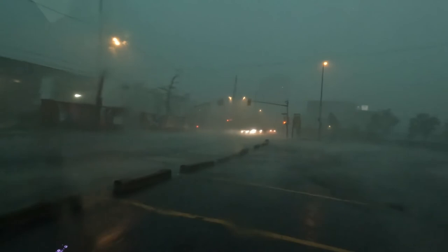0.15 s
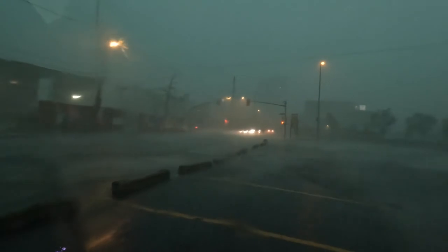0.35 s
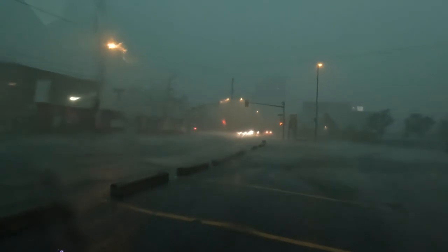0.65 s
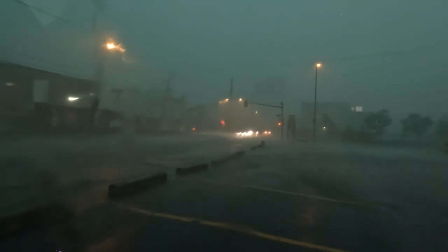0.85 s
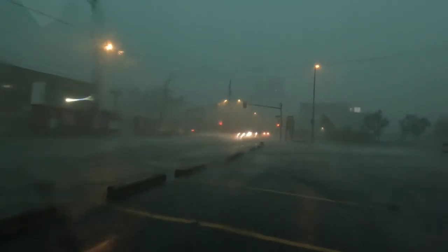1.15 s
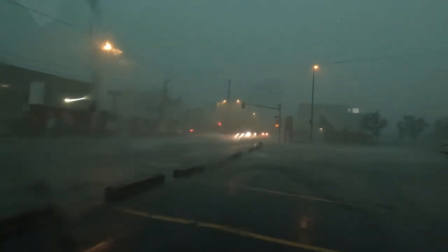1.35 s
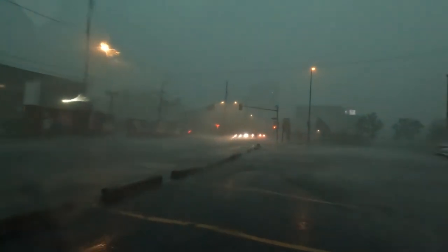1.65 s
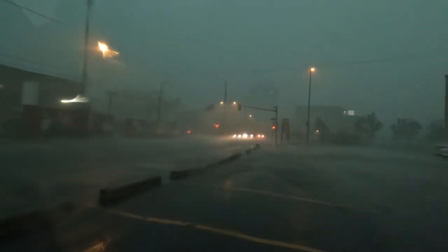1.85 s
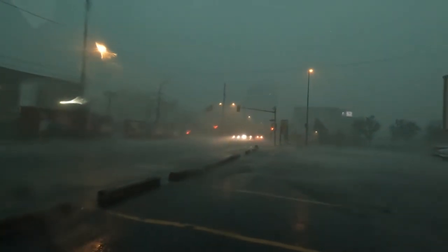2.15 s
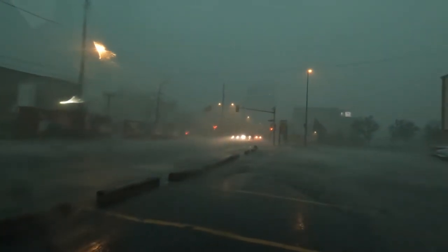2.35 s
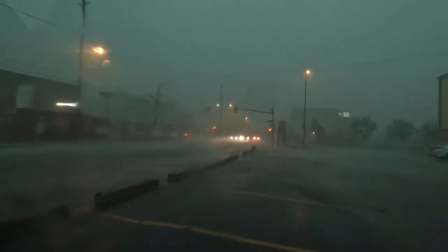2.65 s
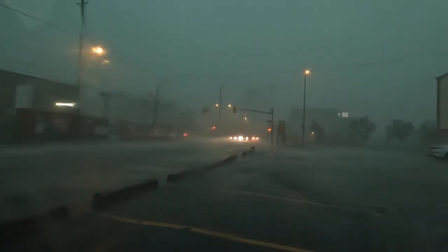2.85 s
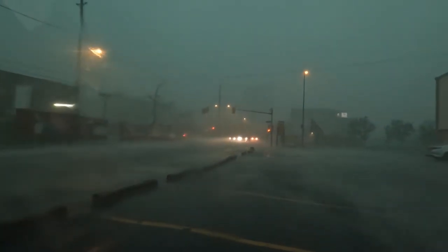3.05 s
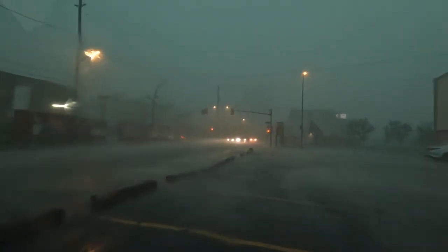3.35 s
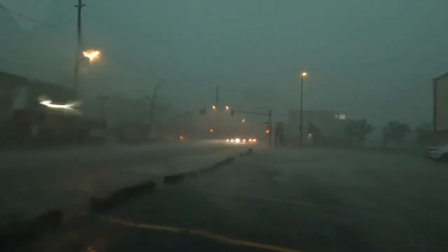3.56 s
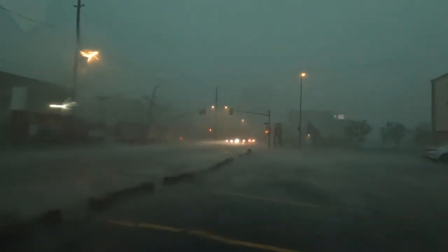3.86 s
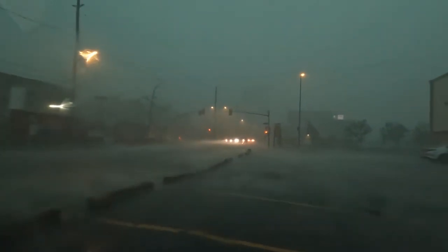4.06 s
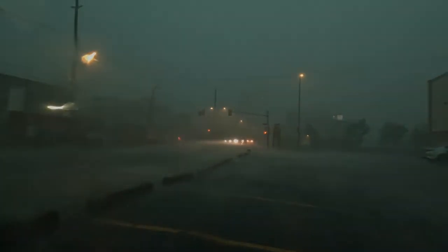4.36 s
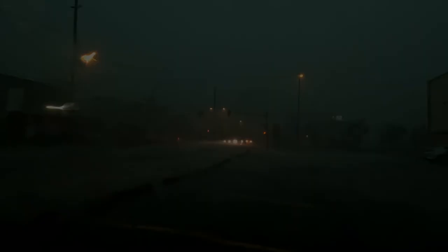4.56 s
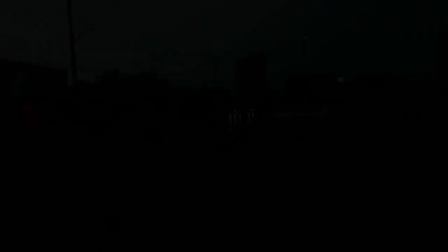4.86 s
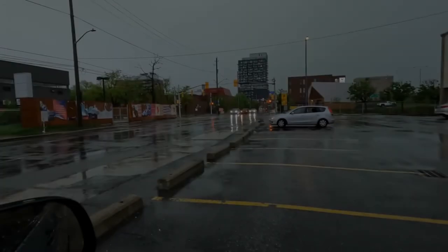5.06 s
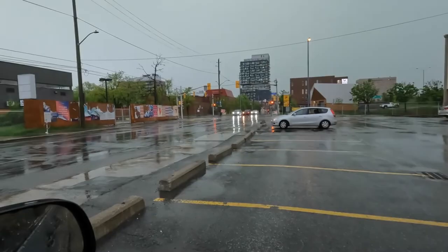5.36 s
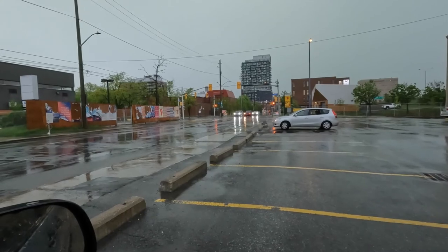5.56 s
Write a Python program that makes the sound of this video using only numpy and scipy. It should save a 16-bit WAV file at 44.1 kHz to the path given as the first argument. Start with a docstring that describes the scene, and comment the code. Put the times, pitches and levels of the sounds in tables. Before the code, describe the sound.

Inside a car, a rainstorm pounds and buffets in quick surges, dies away, then abruptly becomes soft even rain over a low rumble.

```python
"""A violent rainstorm heard from a parked car. From the start, gusts throw sheets of rain: dense noise
drums on the body and sharper noise spatters on the glass. Low noise and short, deep pulses make the wind
that buffets the car and booms in the cabin; a band of noise wandering in pitch is its hollow howl.
The storm fades to silence. A cut then leads to lighter, steady rain made of noise and small impacts,
over a low rumble and drone of evened-out noise, with a faint, brief squeak of gliding tones."""
import sys
import numpy as np
from scipy import signal
from scipy.fft import rfft, irfft
from scipy.io import wavfile
from scipy.ndimage import uniform_filter1d

SR = 44100
rng = np.random.default_rng(int(sys.argv[2]) if len(sys.argv) > 2 else 0)


def put_to_file(sound):
    """Save the sound as 16-bit audio at rate SR, in the file named by the first command-line argument."""
    columns = np.atleast_2d(sound).T  # one column per channel
    safe = np.clip(columns, -1, 1)
    whole_steps = np.round(safe * 32767)
    wavfile.write(sys.argv[1], SR, whole_steps.astype(np.int16))


N = 252232
TIME, FREQS = np.arange(N) / SR, np.fft.rfftfreq(N, 1 / SR)
CUT_S, FADE_START_S, FADE_POWER = 4.806, 4.414, 1.1  # the storm fades to silence at the cut
EDGE_HZ = 13900  # top of the sound
# the downpour between gusts
LULL_ROAR_DB, LULL_SPRAY_DB, LULL_BOOM_DB, LULL_LIFT_DB = -38, -44, -33.5, 1.5
GUST_FALL_POWER = 1.5  # shape of every gust's fall: 1 = exponential, 2 = bell


def gust_shape(crest_s, rise_s, fall_s):
    """One gust: a quick swell to a rounded crest, then a fall along the shared curve."""
    early = np.maximum(crest_s - TIME, 0)
    late = np.maximum(TIME - crest_s, 0)
    return np.exp(-(early / rise_s) ** 2 - (late / fall_s) ** GUST_FALL_POWER)


# gusts, each flinging a sheet of rain at the car; levels are what each adds at its crest:
# (crest_s, rise_s, fall_s, roar_db on the body, spray_db on the glass, boom_db in the cabin,
#  lift_db of the roar's treble)
GUST_ROWS = [(0.04, 0.075, 0.12, -24, -33.5, -29, 1.5), (0.24, 0.13, 0.13, -22, -30.5, -29, 3),
             (0.5, 0.22, 0.61, -38.5, -41.5, -30, -5), (0.85, 0.14, 0.1, -26.5, -33, -33, 2.5),
             (0.957, 0.049, 0.11, -35.5, -38.5, -27, -5), (1.269, 0.12, 0.13, -25.5, -38, -26.5, 4),
             (1.395, 0.081, 0.09, -30, -39.5, -31.5, 5), (1.545, 0.099, 0.17, -39, -43.5, -30.5, 2.5),
             (1.834, 0.063, 0.16, -28.5, -40.5, -25.5, 3), (1.974, 0.068, 0.15, -27.5, -36.5, -31, 3),
             (2.094, 0.05, 0.17, -26, -42.5, -32.5, -2.5), (2.304, 0.092, 0.12, -22, -32.5, -29, 0.5),
             (2.434, 0.048, 0.078, -26.5, -37, -33, -1), (2.549, 0.075, 0.19, -25, -32.5, -35, -1),
             (2.757, 0.12, 0.18, -29, -35.5, -34, -6), (2.998, 0.22, 0.14, -25.5, -40, -34, -1),
             (3.216, 0.097, 0.1, -28.5, -50, -28.5, 2.5), (3.318, 0.073, 0.19, -25, -33, -29.5, 0.5),
             (3.579, 0.17, 0.12, -30, -35.5, -34, 0), (3.79, 0.047, 0.087, -27.5, -37, -49, 2),
             (3.888, 0.082, 0.16, -25.5, -36, -33.5, -1), (4.047, 0.11, 0.18, -25.5, -34.5, -29, 0.5),
             (4.32, 0.13, 0.2, -26.5, -36.5, -29, 7), (4.6, 0.15, 0.13, -30.5, -44, -50, 2)]


def gusting():
    """Gusts add their power to the downpour; gives roar, spray, boom and treble lift in dB over time."""
    body, glass, cabin = amp([LULL_ROAR_DB, LULL_SPRAY_DB, LULL_BOOM_DB]) ** 2
    lift = body * LULL_LIFT_DB
    for crest_s, rise_s, fall_s, roar_db, spray_db, boom_db, lift_db in GUST_ROWS:
        power = gust_shape(crest_s, rise_s, fall_s) ** 2
        body = body + power * amp(roar_db) ** 2
        glass = glass + power * amp(spray_db) ** 2
        cabin = cabin + power * amp(boom_db) ** 2
        lift = lift + power * amp(roar_db) ** 2 * lift_db
    # dividing by the power makes the lift an average, where the stronger gust counts more
    return 10 * np.log10(body), 10 * np.log10(glass), 10 * np.log10(cabin), lift / body


# tone colour of the roar: (pitch_hz, relative level_db)
ROAR_COLOUR = [(76, -33), (130, -1.5), (231, 0.5), (287, -1.5), (341, -2), (401, -3.5), (503, -4),
               (570, -3), (805, -9), (920, -8), (1190, -8), (1350, -7), (1640, -12.5), (2230, -16.5),
               (3200, -22.5), (4160, -33.5), (7040, -120)]
# panel resonances that colour the roar: (pitch_hz, width_hz, average boost_db at full ringing)
PANEL_TONES = [(227, 25, 2.5), (347, 32, 0), (596, 51, 2), (934, 69, 4.5), (1080, 110, 3.5),
               (1280, 74, 4.5), (2030, 100, 4), (2170, 70, 3)]
# how strongly the panels ring, less as the wind veers: (time_s, share from 0 to 1)
PANEL_RINGING = [(3.6, 0.98), (3.9, 0.93)]


def roar(roar_db, lift_db):
    """Sheets of rain drum on the panels, too dense to tell the drops apart, and make them ring."""
    drumming = white() + amp(-4) * drops(per_s=1500, spread_db=2.5, splash_s=0.0011, splash_db=-13.5)
    drumming = patchy(drumming, depth_db=0.72, size=(7, 14))
    ringing = ring(drumming, PANEL_TONES, waver=0.17, wander_hz=21.4)
    panels = drumming + follow(PANEL_RINGING, 1) * (ringing - drumming)
    coloured = place(panels, read(ROAR_COLOUR), STORM_IMAGE)
    flicker_db = 0.64 * drift(rate_hz=22)
    return brighten(coloured, 1900, lift_db) * amp(roar_db + flicker_db)


# tone colour of the spray: (pitch_hz, relative level_db)
SPRAY_COLOUR = [(300, -9), (550, -11), (760, -45), (1000, -11), (2200, -2), (3100, -8.5), (5000, -13.5),
                (6800, -17), (7700, -20.5), (8400, -28), (10800, -35.5), (12400, -40), (13300, -40),
                (13900, -64)]
# faint resonances of the glass under the spray: (pitch_hz, width_hz, average boost_db)
GLASS_TONES = [(3730, 53, 3), (6000, 63, 3.5), (6340, 82, 3), (6950, 65, -0.5), (7630, 77, 1.5)]
# lift of the spray's top end in the lull, and how much it gains for each dB of spray
FIZZ_DB, FIZZ_PER_DB = 0.5, 0.6


def spray(spray_db):
    """Driven drops spatter on the glass above a fine hiss; harder gusts add more fizz."""
    spatter = white() + amp(2.0) * drops(per_s=1300, spread_db=1.5, splash_s=0.0072, splash_db=-6)
    spatter = patchy(spatter, depth_db=1.08, size=(12, 14))
    glass = ring(spatter, GLASS_TONES, waver=0.64, wander_hz=30)
    glass = place(glass, read(SPRAY_COLOUR), STORM_IMAGE)
    fizz_db = FIZZ_DB + FIZZ_PER_DB * (spray_db - LULL_SPRAY_DB)
    return brighten(glass, 11700, fizz_db) * amp(spray_db + 0.94 * drift(rate_hz=7))


# tone colour of the wind rocking the body: (pitch_hz, relative level_db)
BUFFET_COLOUR = [(4, 9), (9, 15), (15, 18), (22, 22), (32, 10.5), (42, 6), (60, 7), (120, -57)]
# slow push of the wind that rocks the body: (time_s, level_db)
ROCKING_LEVEL = [(0.2, -32.5), (1.0, -29.5), (1.55, -26), (2.0, -27), (2.3, -34), (2.65, -30), (2.95, -23),
                 (3.3, -31), (3.65, -22.5), (4.0, -28.5), (4.7, -24)]
# tone colour of the cabin boom: (pitch_hz, relative level_db)
BOOM_COLOUR = [(35, -14.5), (58, -3.5), (74, -2), (90, 0.5), (118, -6.5), (170, -13), (235, -15.5),
               (290, -20.5), (350, -16), (600, -60.5)]
# single slaps of wind on the body: (middle_s, level_db, pitch_hz, half_length_s)
SLAP_ROWS = [(0.031, -16, 80, 0.015), (0.104, -20, 85, 0.012), (0.307, -18.5, 93, 0.025),
             (0.441, -12.5, 74, 0.0058), (0.967, -16, 31, 0.03), (1.048, -22, 48, .03),
             (1.211, -18, 14, 0.048), (1.265, -23, 187, .014), (1.425, -28, 38, 0.017),
             (1.474, -16, 17, 0.063), (1.663, -22, 81, 0.023), (1.732, -15.5, 18.5, .06),
             (1.941, -13, 15, 0.035), (2.183, -16, 26, 0.027), (2.264, -14, 19, 0.037),
             (2.378, -19, 89, 0.038), (2.488, -14, 20, 0.046), (2.799, -13.5, 13, 0.047),
             (2.961, -17.5, 13, 0.04), (3.492, -15, 22, 0.062), (3.652, -15.5, 15.7, 0.11),
             (3.763, -15, 17, 0.044), (4.116, -20, 20, 0.049)]


def wind(boom_db):
    """Gusts rock the body and set the cabin air booming; irregular slaps hit it, the deepest from the right."""
    rocking = pressure(BUFFET_COLOUR, STORM_IMAGE, evenness=0.64, size=5000) * amp(follow(ROCKING_LEVEL, 1))
    boom = pressure(BOOM_COLOUR, STORM_IMAGE, evenness=0.88, size=3000) * amp(boom_db)
    slaps = np.zeros(N)
    for middle_s, level_db, pitch_hz, half_length_s in SLAP_ROWS:
        t = TIME - middle_s
        slaps += amp(level_db) * np.exp(-(t / half_length_s) ** 2) * np.cos(2 * np.pi * pitch_hz * t)
    lean = amp(read(STORM_SIDE_DB) / 2) ** np.array([[1], [-1]])  # left and right gains
    return rocking + boom + irfft(rfft(slaps) * lean / lean.mean(0), N)


# the wind's hollow howl: (time_s, level_db, pitch_hz before its random wander)
HOWL_PATH = [(0, -58, 1066), (1.7, -55, 1049), (2.3, -31.5, 1060), (3.1, -42, 1119), (3.65, -41, 1058),
             (3.95, -37, 1013), (4.35, -27.5, 990), (4.5, -30.5, 974), (4.75, -47, 953)]
HOWL_HZ, HOWL_WIDTH_HZ = 1024, 580  # its resonance before it is shifted; width at 6 dB down


def howl():
    """A broad, breathy resonance swells and fades, and wanders in pitch."""
    band_db = -20 * np.log10(1 + (2 * (FREQS - HOWL_HZ) / HOWL_WIDTH_HZ) ** 2)
    shift_hz = follow(HOWL_PATH, 2) + 35 * drift(rate_hz=8.03) - HOWL_HZ
    breath = signal.hilbert(place(white(), band_db, STORM_IMAGE))
    # turning the phase moves the whole band up or down in pitch
    band = breath * np.exp(2j * np.pi * np.cumsum(shift_hz) / SR)
    return band.real * amp(follow(HOWL_PATH, 1))


# tone colours after the storm: (pitch_hz, relative level_db)
LIGHT_RAIN_COLOUR = [(200, -0.5), (400, 0), (750, -0.5), (950, 0.5), (1500, -3), (2100, -4.5), (3200, -8.5),
                     (5000, -14.5), (6800, -19.5), (8300, -29), (11000, -43), (13000, -49), (14000, -52)]
RUMBLE_COLOUR = [(10, 4.5), (25, 11.5), (38, 14), (52, 11), (68, 4.5), (90, -8), (140, -49.5)]
DRONE_COLOUR = [(40, -35), (65, -4.5), (88, 0), (108, -0.5), (150, -5), (205, -13.5), (240, -12),
                (280, -19), (315, -17), (400, -30), (700, -75)]
LIGHT_RAIN_DB, RUMBLE_DB, DRONE_DB = -39.5, -30.5, -31


def light_rain():
    """After the storm: an even patter over a deep rumble and a steady low drone."""
    patter = white() + amp(-5.5) * drops(per_s=1300, spread_db=0.0, splash_s=0.0093, splash_db=-13)
    patter = patchy(patter, depth_db=0.6, size=(12, 16))
    rain = place(patter, read(LIGHT_RAIN_COLOUR), CALM_IMAGE)
    rumble = pressure(RUMBLE_COLOUR, CALM_IMAGE, evenness=0.7, size=4000)
    drone = pressure(DRONE_COLOUR, CALM_IMAGE, evenness=0.79, size=1800)
    return amp(LIGHT_RAIN_DB) * rain + amp(RUMBLE_DB) * rumble + amp(DRONE_DB) * drone


# a faint, brief squeak, one row a tone: (middle_s, level_db, pitch_hz, glide_hz_per_s, half_length_s)
SQUEAK_TONES = [(5.196, -38.5, 2030, -1000, 0.009), (5.194, -43.5, 2950, 17000, 0.008),
                (5.21, -40, 2100, -2000, .005)]


def squeak():
    """A few short tones glide up or down in pitch in the light rain."""
    tones = np.zeros(N)
    for middle_s, level_db, pitch_hz, glide, half_length_s in SQUEAK_TONES:
        t = TIME - middle_s
        swell = np.exp(-(t / half_length_s) ** 2)
        tones += amp(level_db) * swell * np.sin(2 * np.pi * (pitch_hz + glide * t / 2) * t)
    return tones


def pressure(spectrum, image, evenness, size):
    """Low turbulent noise whose lumps are partly evened out over size samples."""
    x = place(white(), read(spectrum), image)
    power = uniform_filter1d(uniform_filter1d(x.mean(0) ** 2, size), size // 2)
    x = x / (abs(power) + 1e-6) ** (np.clip(evenness, 0, 1) / 2)
    return x / x.mean(0).std()


def drops(per_s, spread_db, splash_s, splash_db):
    """Random impacts, mostly small, each a noisy tick with a short splash that dies away."""
    t, out = np.arange(2048) / SR, np.zeros((2, N))
    burst = np.exp(-t / 0.00033) + amp(splash_db) * np.exp(-t / splash_s)
    for _ in range(8):  # eight different splash noises share the drops
        hit = rng.random(N) < per_s / 8 / SR
        sizes = hit * amp(spread_db * np.minimum(rng.exponential(1, N), 4.5))
        splash = rng.standard_normal((2, len(t))) * burst
        out += signal.oaconvolve(sizes[None], splash, axes=1)[:, :N]
    return unit(out)


def ring(x, resonances, waver, wander_hz):
    """Resonances swell, fade and shift a little as the rain lands on different spots."""
    hz, _, z = signal.stft(x, SR, nperseg=2048, noverlap=1536)
    gain_db = np.zeros(z.shape[1:])
    for centre_hz, width_hz, boost_db in resonances:
        wanders = uniform_filter1d(rng.standard_normal((2, z.shape[2])), size=18, axis=1)
        swell, shift = (unit(row) for row in wanders)
        distance_hz = hz[:, None] - centre_hz - wander_hz * shift
        gain_db += boost_db * np.maximum(1 + waver * swell, 0) / (1 + (2 * distance_hz / width_hz) ** 2)
    return signal.istft(z * amp(gain_db), nperseg=2048, noverlap=1536)[1][:, :N]


def patchy(x, depth_db, size):
    """Swells and dips in random patches of pitch and time, size = (bins, frames)."""
    z = signal.stft(x, nperseg=512, noverlap=384)[2]
    field = rng.standard_normal(z.shape[1:])
    field = unit(uniform_filter1d(uniform_filter1d(field, size[0], axis=0), size[1], axis=1))
    return signal.istft(z * amp(depth_db * field), nperseg=512, noverlap=384)[1][:, :N]


def brighten(x, corner_hz, shelf_db):
    """Raises or lowers the treble above a corner, following a curve in dB."""
    treble = irfft(rfft(x) / (1 + (corner_hz / (FREQS + 1)) ** 8), N)
    return x + treble * (amp(shelf_db) - 1)


# how alike left and right are: (pitch_hz, likeness from 0 to 1)
STORM_SAME_SHARE = [(25, 1), (80, 1), (140, 0.98), (300, 0.99), (610, 0.97), (1320, 0.99), (2200, 0.88),
                    (3000, 0.45), (6200, 0.96), (9000, 0.62), (10800, 0.89), (13000, 0.12)]
CALM_SAME_SHARE = [(40, 0.98), (85, 1), (130, .9995), (250, 0.99), (520, 1), (1200, 0.91), (3000, 0.85),
                   (5500, 0.82), (7000, 0.95)]
# how much louder left is than right: (pitch_hz, difference_db)
STORM_SIDE_DB = [(25, -7.5), (65, 0.5), (250, 0.5), (650, 3.5), (1300, 3.5), (2300, -2), (3200, -0.5),
                 (4500, -1.5), (5600, 1), (7000, 5.5), (8800, 5.5), (10300, -0.5), (12300, 9)]
CALM_SIDE_DB = [(100, -0.1), (2200, -.8), (8000, .5)]
# how far left runs ahead of right: (pitch_hz, lead_radians)
STORM_LEAD_RAD = [(200, 0.013), (780, -0.22), (2300, -0.37), (3100, -1.2), (3700, -0.33), (5300, -0.74),
                  (6000, -0.66)]
CALM_LEAD_RAD = [(200, -0.028), (1200, -0.37), (2800, -0.48), (6500, -0.1)]
STORM_IMAGE = (STORM_SAME_SHARE, STORM_SIDE_DB, STORM_LEAD_RAD)
CALM_IMAGE = (CALM_SAME_SHARE, CALM_SIDE_DB, CALM_LEAD_RAD)


def place(x, colour_db, image):
    """Colours two unrelated signals and blends them into left and right; their middle has rms 1."""
    same, side_db, lead = (read(points) for points in image)
    same = np.clip(same, 0, 1)
    a, b = rfft(x) * amp(colour_db)
    common, apart = a * np.sqrt(1 + same), b * np.sqrt(1 - same)
    lean = amp(side_db / 2) * np.exp(.5j * lead)
    sides = np.array([(common + apart) * lean, (common - apart) / lean])
    pair = irfft(sides / np.cosh(np.log(abs(lean))), N)
    return pair / pair.mean(0).std()


def amp(db):
    """Decibels to gain."""
    return 10 ** (np.asarray(db) / 20)


def unit(x):
    """Scales to rms 1."""
    return x / np.sqrt(np.mean(x ** 2) + 1e-20)


def read(points):
    """A table over frequency, joined on a log axis."""
    hz, value = np.transpose(points)
    return np.interp(np.log(FREQS + 1), np.log(hz + 1), value)


def follow(rows, column):
    """One column of a table over time, for every sample."""
    rows = np.asarray(rows)
    return np.interp(TIME, rows[:, 0], rows[:, column])


def white():
    """Two unrelated noises."""
    return rng.standard_normal((2, N))


def drift(rate_hz):
    """A random wander of rms 1, mostly slower than the given rate."""
    return unit(irfft(rfft(rng.standard_normal(N)) / (1 + (FREQS / rate_hz) ** 4), N))


def scene():
    """The storm's fade ends in silence, then the light rain cuts in."""
    roar_db, spray_db, boom_db, lift_db = gusting()
    storm = roar(roar_db, lift_db) + spray(spray_db) + howl() + wind(boom_db)
    fade_out = np.clip((CUT_S - TIME) / (CUT_S - FADE_START_S), 0, 1) ** FADE_POWER
    # 3 ms ramps at the cut and at the very end
    cut_in = np.clip(np.minimum(TIME - CUT_S, TIME[-1] - TIME) / .003, 0, 1)
    return storm * fade_out + (light_rain() + squeak()) * cut_in


def record(dry):
    """A steep filter removes the treble above the top edge."""
    lowpass = signal.firwin(255, EDGE_HZ, window=("kaiser", 8), fs=SR)
    return signal.oaconvolve(dry, lowpass[None], "same")


dry = scene()
out = record(dry)
put_to_file(out)
```